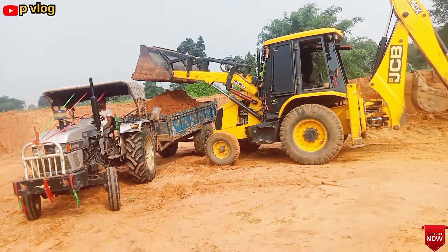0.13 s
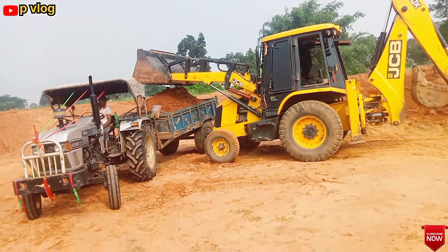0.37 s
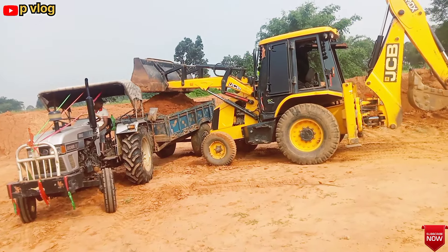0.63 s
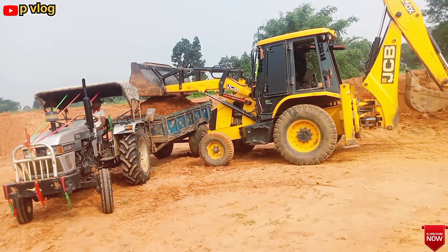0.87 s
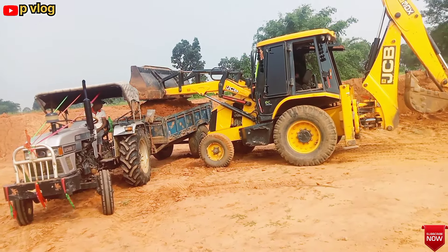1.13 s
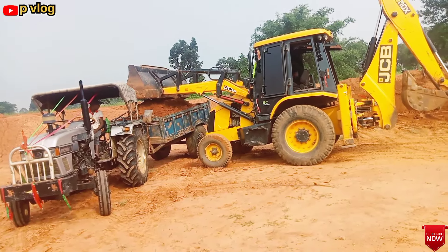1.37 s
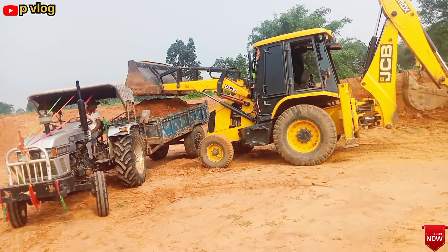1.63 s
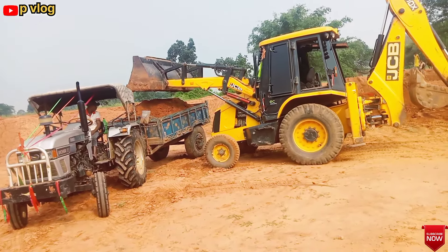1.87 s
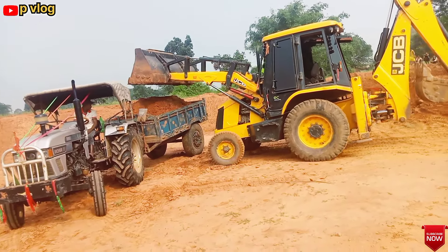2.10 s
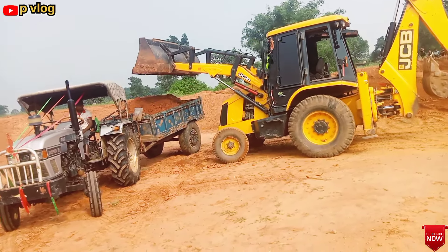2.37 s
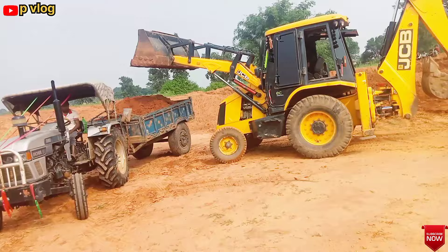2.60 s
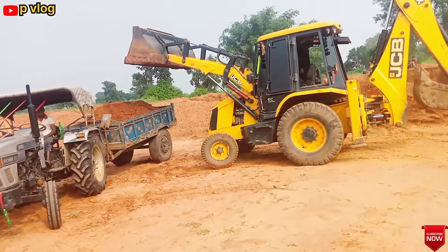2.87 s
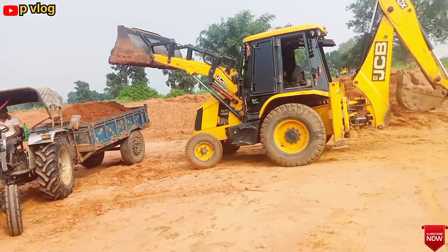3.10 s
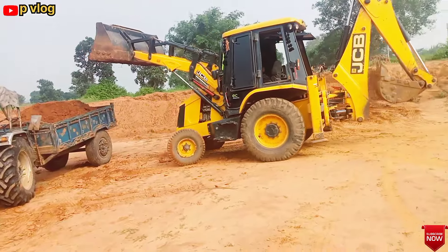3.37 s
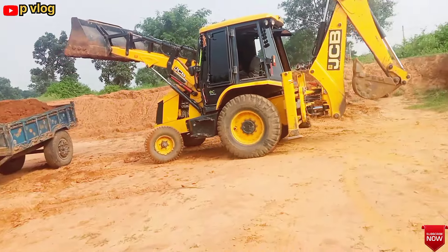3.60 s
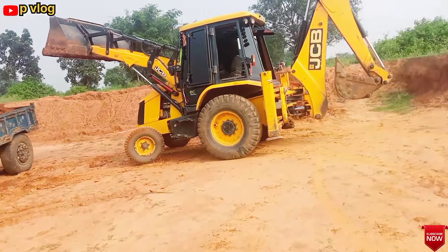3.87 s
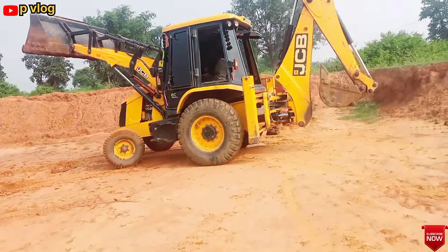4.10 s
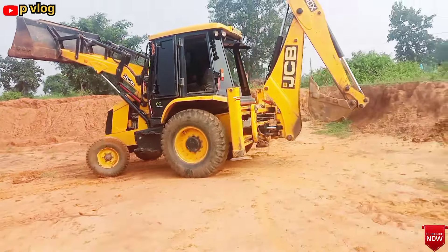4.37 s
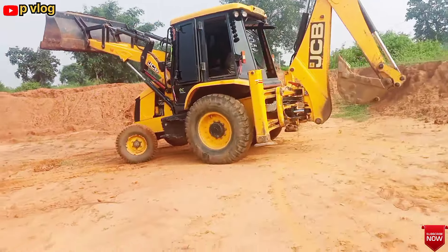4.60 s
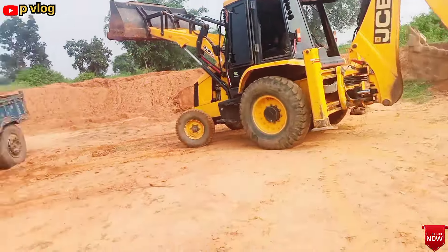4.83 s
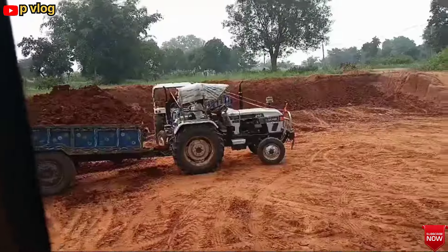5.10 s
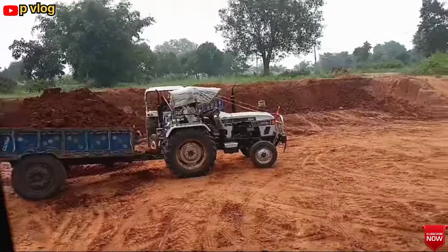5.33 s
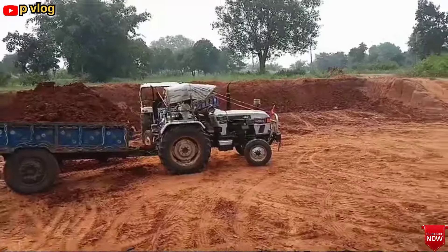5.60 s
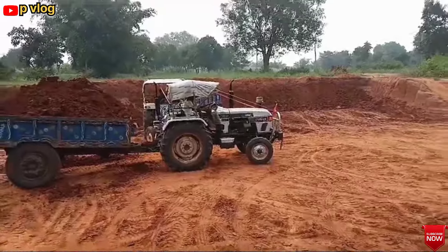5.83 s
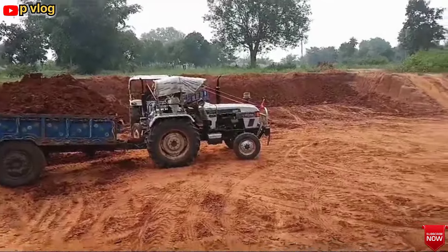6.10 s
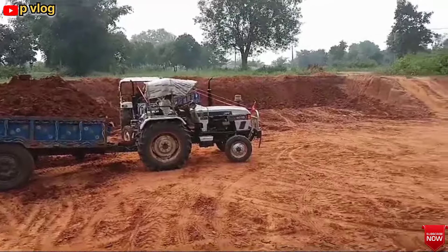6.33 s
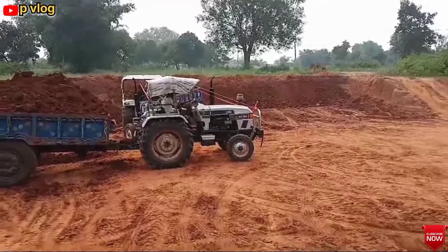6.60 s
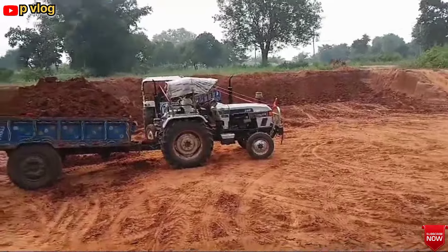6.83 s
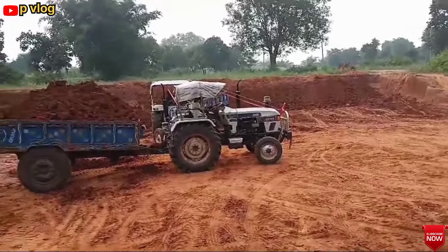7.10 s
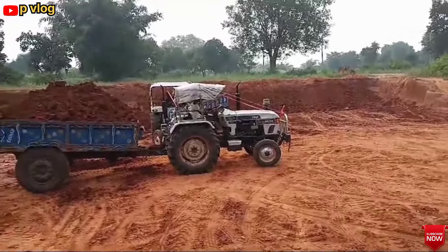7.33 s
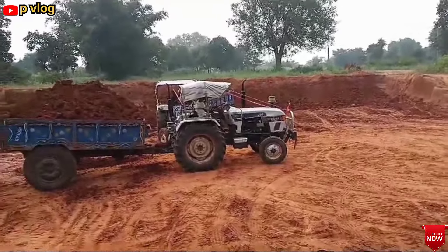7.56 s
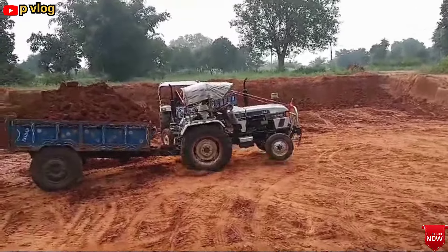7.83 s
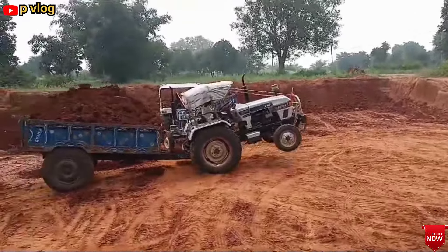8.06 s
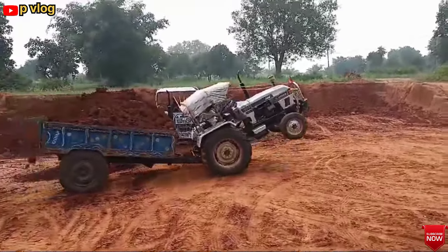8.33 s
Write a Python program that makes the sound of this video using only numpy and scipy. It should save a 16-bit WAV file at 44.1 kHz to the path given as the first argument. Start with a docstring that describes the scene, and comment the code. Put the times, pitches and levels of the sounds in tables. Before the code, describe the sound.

Outdoor diesel engines: slow puffing tractor speeding up beside a revving digger, an abrupt cut, then a loud high-revving tractor straining deeper under load.

```python
"""Tractors and digger in an earth pit

Two scenes. First, in mono, a digger revs and backs away (engine multiples over throbbing noise) while a slow
three-cylinder tractor puffs, speeds up and draws nearer (one noise burst a firing), with squeaks and rattles.
After a short silence, in stereo, a loaded tractor holds high revs, then lugs down as it takes the load
(sines tied to the engine cycle, pulsing roar and hiss, singing panels); the digger idles close by (steady sines).
"""
import sys
import numpy as np
from scipy import signal
from scipy.fft import rfft, irfft, next_fast_len
from scipy.io import wavfile
from scipy.ndimage import uniform_filter1d, map_coordinates

SR = 44100
rng = np.random.default_rng(int(sys.argv[2]) if len(sys.argv) > 2 else 0)


def ratio_of_db(decibels):
    """Turn decibels (scalar or array-like) into linear amplitude factors; 0 dB maps to 1."""
    return 10 ** (np.asarray(decibels, float) / 20)


def transcribe(signal):
    """Save signal, clipped to [-1, 1], as a 16-bit WAV file at the path in sys.argv[1]."""
    frames = np.atleast_2d(signal).T
    limited = np.clip(frames, -1, 1)
    pcm = np.round(limited * 32767).astype(np.int16)
    wavfile.write(sys.argv[1], SR, pcm)


N = 372632
TIME = np.arange(N) / SR
FIRST_ENDS_S, SECOND_STARTS_S = 4.96, 5.083


def unit(x):
    """Scaled to rms 1."""
    return x / np.sqrt(np.mean(x ** 2) + 1e-20)


def along(points, hz):
    """(position, value) points read on a log axis."""
    f, v = np.transpose(points)
    return np.interp(np.log(hz + 1), np.log(f + 1), v)


def curves(rows, at=TIME):
    """Each column after the time, read at the given moments."""
    s, *cols = np.transpose(rows)
    return [np.interp(at, s, c) for c in cols]


def wobble(rate):
    """A smooth random curve, rate knots a second."""
    knots = rng.standard_normal(int(N * rate / SR) + 4)
    return map_coordinates(knots, [TIME * rate])


def filtered(x, response):
    """x times a response of frequency."""
    m = next_fast_len(x.shape[-1] + 4096)
    spectrum = rfft(x, m) * response(np.fft.rfftfreq(m, 1 / SR))
    return irfft(spectrum, m)[..., :x.shape[-1]]


def resonance(hz, centre, width):
    """A peak of height 1, falling off to either side of its centre."""
    return 1 / (1 + (2 * (hz - centre) / width) ** 2)


def patchy(depth_db, channels):
    """White noise with patches of random gain in time and frequency, alike in all channels."""
    z = signal.stft(rng.standard_normal((channels, N)), nperseg=512)[2]
    field = uniform_filter1d(rng.standard_normal(z.shape[1:]), size=3, axis=0)
    field = uniform_filter1d(field, size=5, axis=1)
    return signal.istft(z * ratio_of_db(depth_db * unit(field)), nperseg=512)[1][:, :N]


def tone(cycles, db, unsteady_db):
    """A slightly unsteady sine; db is its rms level before the unsteadiness."""
    level = np.sqrt(2) * ratio_of_db(db + unsteady_db * wobble(9))
    return level * np.sin(2 * np.pi * (cycles + rng.random()))


# Multiples of the loaded tractor's engine cycle that stand out; all others lie about BETWEEN_DB.
# Each row: multiple of the cycle, level in dB over a point 12 dB under the engine level.
HAUL_ORDERS = [(3, -15), (5, -13), (6, -7.5), (8, -6.5), (9, 0.7), (12, -4), (22, -4.5), (23, -9),
               (24, -0.2), (25, -8.5), (26, -5), (29, -10), (30, -10.5), (32, -10), (35, -6.5), (36, -7),
               (39, -9), (43, -7), (46, -7), (48, -5.5)]
# How the load changes the multiples. Each row: multiple of the cycle, change in dB.
LUGGING_ORDERS = [(3, 4.5), (4, -7), (6, 10), (7, -7), (12, -2.5), (24, -14.5), (48, -10)]
# Colour of the combustion roar. Each row: frequency in Hz, relative density in dB per Hz.
ROAR_COLOUR = [(20, -19), (45, -23), (90, -11), (178, -7), (336, -12), (480, -9), (1840, -6.5),
               (2040, -12.5), (2500, -10.5), (4000, -32), (6000, -82.5)]
# How the load changes the roar. Each row: frequency in Hz, change in dB.
LUGGING_ROAR = [(200, 4.5), (400, -3), (680, 5), (1000, -2), (1400, -0.5), (1800, -3.5), (2150, 3.5),
                (4000, -6)]
# Bonnet resonances. Each row: frequency in Hz, width in Hz, strength in dB (halved, then scaled, in haul()).
BONNET = [(1118, 113, -6), (1392, 38, 5), (1867, 66, -2.5)]
# Colour of the hiss. Each row: frequency in Hz, relative density in dB per Hz.
HISS_COLOUR = [(1800, -28.5), (3000, -1.5), (3590, 4), (3930, -1.5), (5450, -3), (6380, -9.5), (7460, -7.5),
               (8300, -19.5), (8850, -28.5), (9050, -70), (14500, -60.5)]
ENGINE_DB, HISS_DB = -19.5, -32.5  # before the load and the fade-in
FADE_DB, FADE_S = 13, 0.075  # the scene fades in from FADE_DB under
CYCLE_HZ, LOAD_S, SAG_HZ, SAG_S = 19.32, 7.81, 8.5, .42  # engine cycles a second; the clutch bites, speed sags
BITE_S, STRAIN_DB, STRAIN_S = 0.081, 3, 0.25  # the labour sets in; a swell with the load, dying away
BETWEEN_DB, BETWEEN_SPREAD_DB = -16.5, 0.5
CRANK_JITTER = 0.0033  # cycles by which the crank runs ahead or behind, times a random curve


def haul():
    """Uneven cylinders give every multiple of the engine cycle; roar and hiss pulse with the firings."""
    loaded = np.clip(TIME - LOAD_S, 0, None)
    lugging = 1 - np.exp(-loaded / BITE_S)
    fade_db = fade_in_db()
    engine_db = ENGINE_DB + fade_db + STRAIN_DB * lugging * np.exp(-loaded / STRAIN_S)
    hiss_db = HISS_DB + fade_db + 1.4 * lugging
    cycle_hz = CYCLE_HZ - SAG_HZ * (1 - np.exp(-loaded / SAG_S))
    turns = np.cumsum(cycle_hz) / SR + CRANK_JITTER * wobble(14)

    strong = dict(HAUL_ORDERS)
    orders = np.zeros(N)
    for k in range(3, 49):
        db = strong.get(k, BETWEEN_DB + BETWEEN_SPREAD_DB * rng.standard_normal())
        orders += tone(k * turns, db + lugging * along(LUGGING_ORDERS, k) + engine_db - 12, 1.18)
    # a wavering gear whine tied to the shaft swells at the bite, then dies with the speed
    whine_db = engine_db - 12.5 + 7 * lugging - 200 * loaded ** 2
    whine = tone(59 * turns + 0.39 * wobble(50), whine_db, 2.9)

    # three firings a cycle, each a sudden blow that dies away
    throb = 1 + (0.14 + 0.11 * lugging) * signal.sawtooth(2 * np.pi * 3 * turns, 0)

    def roar_response(hz):
        """The roar's colour, lifted where the bonnet resonates."""
        peaks = sum(ratio_of_db(db / 2) * resonance(hz, c, w) for c, w, db in BONNET)
        return ratio_of_db(along(ROAR_COLOUR, hz)) * (1 + 1.45 * peaks)

    roar = unit(filtered(throb * patchy(0.74, channels=2), roar_response))
    # the labouring engine sounds deeper
    roar += lugging * filtered(roar, lambda hz: ratio_of_db(along(LUGGING_ROAR, hz)) - 1)
    hiss = unit(filtered(throb * patchy(1.87, channels=2), lambda hz: ratio_of_db(along(HISS_COLOUR, hz))))
    tones = orders + whine + idle() + rings()
    tone_pair = [tones, np.roll(tones, 900)]  # a delayed copy serves as the second input
    return ports(ratio_of_db(engine_db - 1.7) * roar + ratio_of_db(hiss_db) * hiss + tone_pair, lag=6.3)


def fade_in_db():
    """Gain with which the second scene fades in."""
    return -FADE_DB * np.exp(-np.clip(TIME - SECOND_STARTS_S, 0, None) / FADE_S)


# Likeness of the two microphone ports. Each row: frequency in Hz, left-right correlation.
ALIKE = [(250, 0.97), (500, 1), (1000, 0.84), (2000, 0.11), (4000, 0.2), (8000, 0.088)]
# Stereo lean. Each row: frequency in Hz, left over right in dB.
LEAN = [(300, 0.5), (900, 1.5), (1600, 3), (2780, 10), (4800, 1), (8300, 13.5)]


def ports(pair, lag):
    """Two inputs become left and right; the left port leans louder and lags by some samples."""
    turn = lambda hz: np.arccos(np.clip(along(ALIKE, hz), -1, 1)) / 2
    mid, side = filtered(pair, lambda hz: np.array([np.cos(turn(hz)), np.sin(turn(hz))]))
    # half the lean and lag on the left, the opposite half on the right
    lean = lambda hz: ratio_of_db(along(LEAN, hz) / 2) * np.exp(-1j * np.pi * hz * lag / SR)
    return filtered(np.array([mid + side, mid - side]), lambda hz: np.array([lean(hz), 1 / lean(hz)]))


# Panels singing as the tractor rears.
# Each row: start in seconds, length in seconds, level in dB, pitch in Hz.
PANEL_RINGS = [(7.94, 0.19, -28, 681), (8, 0.16, -31, 2040), (8.14, 0.025, -23, 1980),
               (8.197, 0.15, -22.5, 1386), (8.2, 0.14, -33, 614)]


def rings():
    """A panel takes up one pitch, unsteadily, for a moment."""
    out = np.zeros(N)
    for s, length, db, hz in PANEL_RINGS:
        swell = np.exp(-(2 * (TIME - s - length / 2) / length) ** 4)
        out += swell * tone(hz * TIME + 0.31 * wobble(70), db, 3.5)
    return out


# The slow tractor's speed. Each row: time in seconds, firings a second.
PUFF_RATE = [(0, 13.38), (1, 13.79), (1.9, 13.76), (2.3, 13.72), (2.7, 15.57), (3.1, 16.7), (3.5, 16.44),
             (3.9, 17.65), (4.2, 19.4), (4.6, 20.35), (4.96, 21.12)]
FAR_DB, NEAR_DB, PUFF_DB_PER_HZ = -46.5, -38.5, 1.48  # puffs far off, close by, and gain with the firing rate
NEARING_S, NEARING_TAKES_S = 3.2, .4  # the slow tractor comes into the open
NEARING_RATE = 16.4  # firings a second at which close puffs have NEAR_DB


def approach(at):
    """Puff level in dB and nearness 0-1 of the slow tractor: close by, faster is louder."""
    near = np.clip((at - NEARING_S) / NEARING_TAKES_S, 0, 1)
    close_db = NEAR_DB + PUFF_DB_PER_HZ * (curves(PUFF_RATE, at)[0] - NEARING_RATE)
    return FAR_DB + near * (close_db - FAR_DB), near


def surge(t, rise, life):
    """An envelope that rises from t = 0 and dies away, times in seconds."""
    return np.where(t > 0, (1 - np.exp(-(t / rise) ** 2)) * np.exp(-abs(t) / life), 0)


# Level of the three cylinders in turn, at any distance. Each entry: dB.
CYLINDERS_DB = [0.13, -1.5, 0]
# What each adds from close by, where one cylinder barks. Each entry: dB when fully near.
NEAR_CYLINDERS_DB = [1.07, -1.5, -1]
# Firings harder or softer than their turn. Each row: time in seconds, change in dB.
ODD_PUFFS = [(4.146, 0.5), (4.748, -1), (4.792, -2.5), (4.841, 2.5), (4.89, 2), (4.936, -3)]
# Puff colour at a distance. Each row: frequency in Hz, relative density in dB per Hz.
FAR_COLOUR = [(150, -47), (330, 7), (600, -45.5), (880, -6), (1450, -0.5), (2100, -11), (3300, -12.5),
              (4100, -42), (7000, -64.5)]
# Puff colour close by. Each row: frequency in Hz, relative density in dB per Hz.
NEAR_COLOUR = [(150, -33), (330, -9.5), (850, -24.5), (1500, -9.5), (2500, -21.5), (3400, -23.5),
               (3950, -38), (5300, -41.5), (6400, -55), (9000, -59.5), (14500, -55.5), (15800, -69.5)]
# Modes of the exhaust stack. Each row: frequency in Hz, width in Hz, mean gain in dB close by (half far off).
STACK = [(644, 140, 11), (1057, 240, 20), (1430, 57, 8.5), (1750, 160, 7), (1950, 120, 5), (2904, 110, 8.5),
         (4390, 260, 11), (5520, 710, 11)]
# Hum under the puffs. Each row: multiple of the firing rate, dB from the puff level (8 dB more close by).
PUFF_ORDERS = [(3, -28.5), (4, -32.5), (6, -27.5), (7, -34.5)]
# the blow that opens each puff rings the stack, a little off pitch each time; a harder firing knocks more loudly
KNOCK, KNOCK_RISE_S, KNOCK_LIFE_S, KNOCK_DETUNE = 0.19, 0.0027, 0.0051, 0.022  # KNOCK close by, half far off
KNOCK_GROWS = .8  # dB of knock per dB of hardness
# above TREBLE_HZ the puff is soft-edged noise, spread wider in time than the rest; modes there roam widely
TREBLE_HZ, TREBLE_SPREAD_S, TREBLE_RISE_S, TREBLE_LIFE_S = 4080, 0.0056, 0.011, 0.0087
TREBLE_DETUNE = .05


def puffs():
    """Each firing blows gas through the stack, with a softer second surge; modes differ from puff to puff."""
    turns = np.cumsum(curves(PUFF_RATE)[0]) / SR + .25
    firing = np.arange(1, int(turns[-1]) + 1)
    start = np.interp(firing, turns, TIME)
    level_db, near = approach(start)
    modes_luck = rng.standard_normal((len(firing), len(STACK)))
    treble_luck, knock_luck, second_luck = rng.standard_normal((3, len(firing), 1))
    hard_db = near * np.take(NEAR_CYLINDERS_DB, firing % 3) + 0.91 * rng.standard_normal(len(firing))
    for s, db in ODD_PUFFS:
        hard_db[np.argmin(abs(start - s))] += db

    lead = SR // 50  # samples kept ahead of the firing
    t = (np.arange(SR // 8) - lead) / SR
    noise = lambda: rng.standard_normal((len(firing), len(t)))
    first = surge(t + 0.0052, 0.0057, 0.0081) * noise()
    second = 0.3 * ratio_of_db(1.3 * second_luck) * surge(t - .012, 0.0017, 0.028) * noise()
    second = filtered(second, lambda hz: 1 / (1 + (hz / 3600) ** 8))  # the second surge is duller

    high = lambda hz: 1 / (1 + (TREBLE_HZ / (hz + 1)) ** 12)
    # offsets the puff's level: the treble stays about equally strong however hard or fast the firing
    offset_db = (hard_db + near * (level_db - NEAR_DB))[:, None]
    treble_envelope = surge(t + TREBLE_SPREAD_S, TREBLE_RISE_S, TREBLE_LIFE_S)
    treble = 2.14 * ratio_of_db(1.7 * treble_luck - offset_db) * treble_envelope * noise()
    first = filtered(first, lambda hz: 1 - high(hz)) + filtered(treble, high)

    centre, width, gain_db = np.transpose(STACK)
    detune, phase = rng.standard_normal((2, len(firing), len(STACK), 1))
    spread = np.where(centre > TREBLE_HZ, TREBLE_DETUNE, KNOCK_DETUNE)[:, None]
    pitch = centre[:, None] * (1 + spread * detune)
    ring = np.sin(2 * np.pi * (pitch * t + phase))[:, centre < TREBLE_HZ].sum(axis=1)
    knock = KNOCK * (1 + near[:, None]) / 2 * ratio_of_db(KNOCK_GROWS * hard_db[:, None] + 1.5 * knock_luck)
    first += knock * surge(t + 0.00052, KNOCK_RISE_S, KNOCK_LIFE_S) * ring

    def colour(hz):
        """The colour for the distance; modes stand out more from close by, each at its own strength."""
        strength_db = np.outer(.5 + .5 * near, gain_db) + 3.1 * modes_luck
        modes_db = (strength_db[..., None] * resonance(hz, pitch, width[:, None])).sum(axis=1)
        far_db = np.outer(1 - near, along(FAR_COLOUR, hz))
        return ratio_of_db(modes_db + far_db + np.outer(near, along(NEAR_COLOUR, hz)))

    bursts = filtered(first + second, colour)
    size_db = level_db + np.take(CYLINDERS_DB, firing % 3) + hard_db
    taper = signal.windows.tukey(len(t), .2)
    out = np.zeros(N + SR)
    for s, db, burst in zip(start, size_db, bursts):
        out[round(s * SR):][:len(t)] += ratio_of_db(db) * unit(burst) * taper
    level_db, near = approach(TIME)
    hum = sum(tone(k * turns, level_db + 8 * near + db, 1.7) for k, db in PUFF_ORDERS)
    return out[lead:][:N] + hum


# The digger's engine speed. Each row: time in seconds, firings a second.
DIGGER_RATE = [(.7, 33.9), (1.5, 33), (1.9, 36.3), (2.1, 36.5), (2.33, 40.5), (2.5, 42.5), (2.75, 43.5),
               (3, 44), (3.6, 43.7), (4.1, 41.8), (4.2, 40), (4.7, 36.3), (4.96, 35.2)]
# Throttle under load. Each row: start in seconds, hold in seconds, release in seconds, level in dB.
PUSHES = [(1.79, 0.2, 0.069, -39.5), (2.1, 0.17, 0.39, -37), (3.397, .72, 0.026, -44)]
# Weaker multiples. Each row: multiple of the firing rate, dB from the 3rd multiple.
DIGGER_ORDERS = [(4, -20), (6, -22)]
# Colour of the clatter. Each row: frequency in Hz, relative density in dB per Hz.
CLATTER_COLOUR = [(20, -51.5), (45, -14), (108, -0.5), (160, -5.5), (349, -7), (600, -13), (950, 0),
                  (1550, -17), (2070, -18.5), (2650, -14), (3640, -25), (4200, -46.5), (6000, -56.5),
                  (9000, -67.5)]
# The drive, working as the digger backs away. Each row: time in seconds, level in dB.
GROWL_LEVEL = [(1.2, -68), (1.9, -46.5), (2.9, -38.5), (3.5, -49)]
# The drive's housing. Each row: frequency in Hz, width in Hz, relative strength in dB.
CASING = [(352, 110, -1), (769, 69, 3.5), (956, 70, 3), (1430, 58, -2), (2580, 180, -11)]
COAST_DB, RECEDE_DB_PER_S = -47, 0.9  # exhaust note off load; it fades as the digger backs away
PUSH_ATTACK_S = 0.083
SECOND_DB, PIPE_DB, PIPE_HZ, PIPE_WIDTH_HZ = -10, 8.5, 87, 5  # 2nd from the 3rd; lifted where the pipe resonates
CLATTER_DB, CLATTER_DB_PER_S = -43.5, 0.68  # at time 0, then swelling steadily


def digger():
    """Low multiples of the firing rate over clatter that throbs once a firing, and the growl of the drive."""
    rate, = curves(DIGGER_RATE)
    turns = np.cumsum(rate) / SR
    pushed = np.zeros(N)
    for s, hold, release, db in PUSHES:
        attack = np.clip((TIME - s) / PUSH_ATTACK_S, 0, 1)
        pushed += ratio_of_db(db) * attack * np.exp(-np.clip(TIME - s - hold, 0, None) / release)
    coasting = ratio_of_db(COAST_DB - RECEDE_DB_PER_S * TIME)
    third_db = 20 * np.log10(np.maximum(coasting, pushed))
    second_db = third_db + SECOND_DB + PIPE_DB * resonance(2 * rate, PIPE_HZ, PIPE_WIDTH_HZ)
    hum = tone(2 * turns, second_db, 0.37) + tone(3 * turns, third_db, 0.61)
    hum += sum(tone(k * turns, third_db + db, 8.5) for k, db in DIGGER_ORDERS)

    throb = 1 + 0.23 * np.cos(2 * np.pi * turns)
    clatter_noise = throb * patchy(2.8, channels=1)[0]
    clatter = unit(filtered(clatter_noise, lambda hz: ratio_of_db(along(CLATTER_COLOUR, hz))))
    casing = lambda hz: sum(ratio_of_db(db) * resonance(hz, c, w) for c, w, db in CASING)
    growl = unit(filtered(patchy(4.2, channels=1)[0], casing))
    clatter_gain = ratio_of_db(CLATTER_DB + CLATTER_DB_PER_S * TIME)
    return hum + clatter_gain * clatter + ratio_of_db(curves(GROWL_LEVEL)[0]) * growl


# The digger idling close by, and a separate steady line at 294 Hz. Each row: frequency in Hz, level in dB.
IDLE_TONES = [(90.2, -34), (105, -46.5), (165.5, -43), (180.4, -34.5), (211, -53), (294, -43.5)]


def idle():
    """Steady tones, the digger's engine and the separate 294 Hz line, sharing one slow drift: they run a little
    ahead or behind."""
    drifting = TIME + 0.00067 * wobble(3)
    return sum(tone(hz * drifting, db + fade_in_db(), 1.4) for hz, db in IDLE_TONES)


# Squeaks near 3.3 kHz, some in step with the puffs, then lower rattles of loose steel.
# Each row: start in seconds, level in dB before the rise and decay, pitch in Hz.
SQUEAKS_AND_RATTLES = [(.41, -40, 3440), (0.771, -41, 3270), (1.06, -42, 3260), (1.13, -34.5, 3200),
                       (1.2, -38, 3200), (1.28, -40, 3250), (1.9, -23.5, 910), (2.129, -24, 975),
                       (2.325, -19, 865), (2.492, -31, 1430), (2.661, -27, 775), (2.7, -30, 1430),
                       (2.885, -33, 950)]


def squeaks_and_rattles():
    """Each squeak or rattle is narrow noise around one pitch that rises and dies away."""
    out, t = np.zeros(N), np.arange(SR // 5) / SR
    envelope = np.clip(t / 0.024, 0, 1) * np.exp(-t / 0.014)
    for s, db, pitch_hz in SQUEAKS_AND_RATTLES:
        band = lambda hz: 1 / (1 + ((hz - pitch_hz) / 90) ** 4)
        burst = filtered(rng.standard_normal(len(t)), band)
        out[round(s * SR):][:len(t)] += ratio_of_db(db) * unit(burst) * envelope
    return out


def recorder_hiss():
    """The recorder's own faint white noise."""
    return ratio_of_db(-85.5) * rng.standard_normal(N)


def scene():
    """The first scene, in mono, stops dead; the second, in stereo, opens after a silence."""
    first = digger() + puffs() + squeaks_and_rattles() + recorder_hiss()
    opening = np.clip((TIME - SECOND_STARTS_S) / 0.0087, 0, 1)
    return first * (TIME < FIRST_ENDS_S) + haul() * opening


def band_limit(x):
    """A steep low-pass at the top of the band."""
    return signal.sosfilt(signal.butter(12, 15700, fs=SR, output="sos"), x)


def record(dry):
    """The finished mix, as it is stored."""
    return band_limit(dry)


dry = scene()
out = record(dry)
transcribe(out)
```